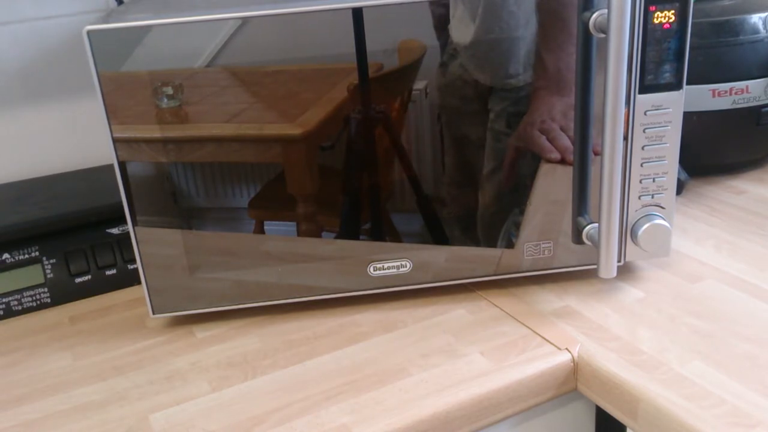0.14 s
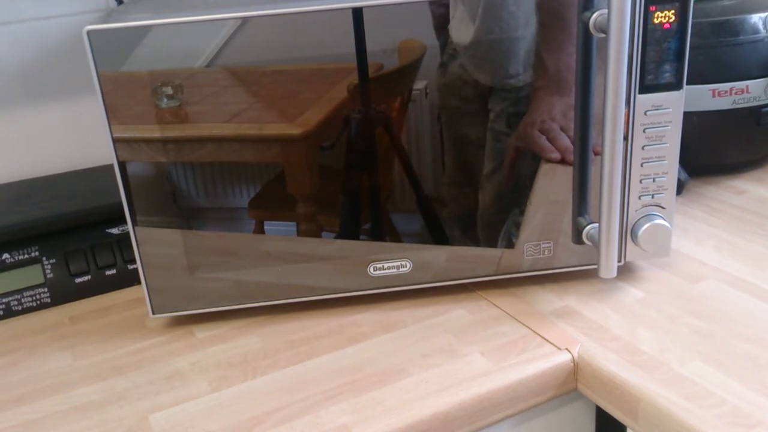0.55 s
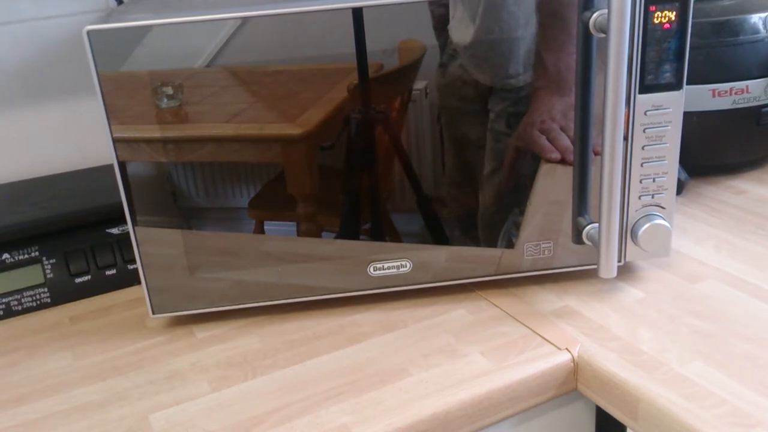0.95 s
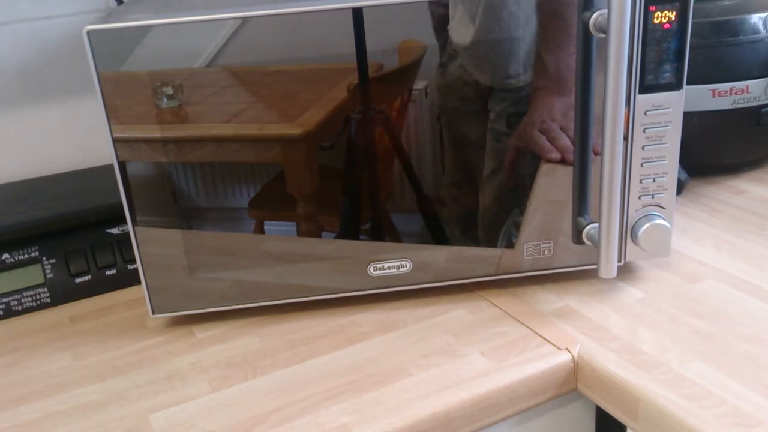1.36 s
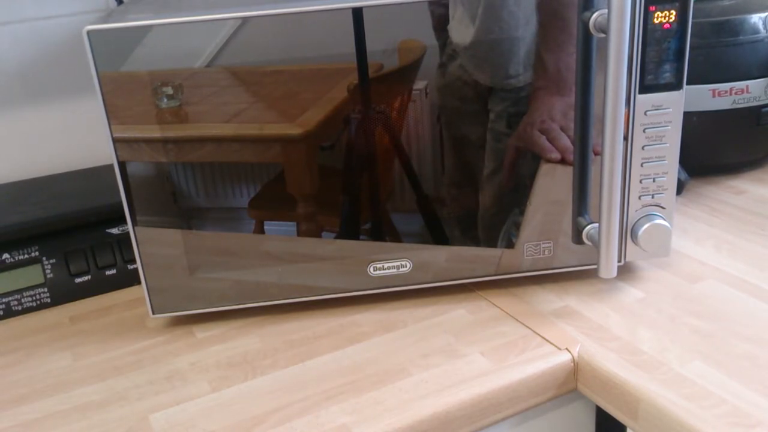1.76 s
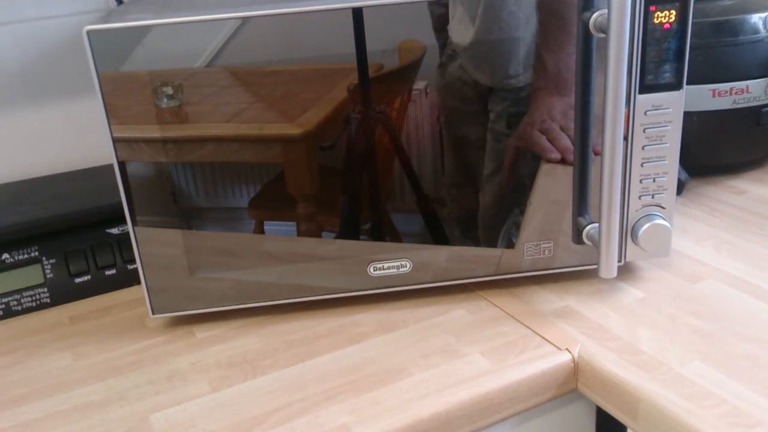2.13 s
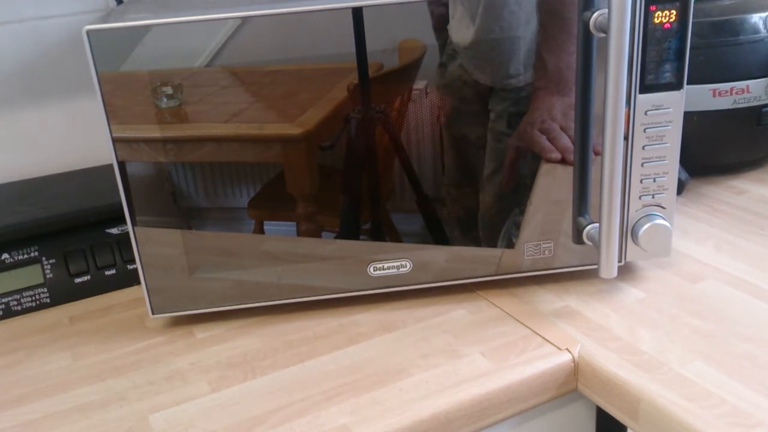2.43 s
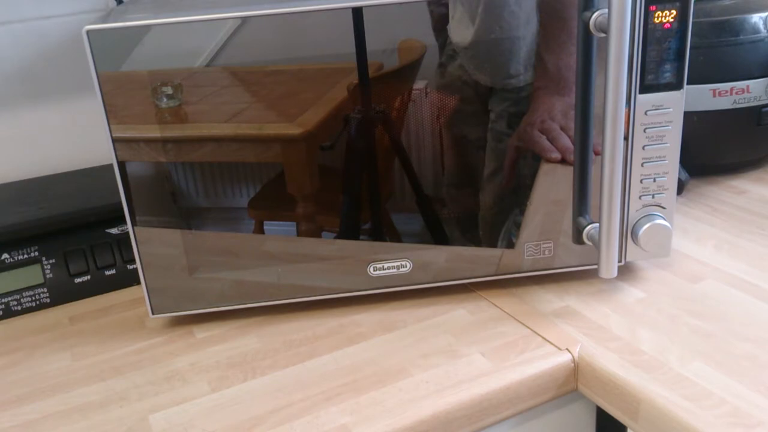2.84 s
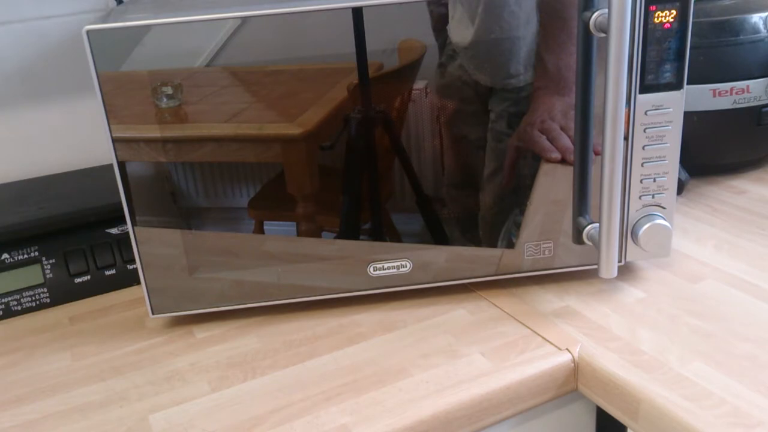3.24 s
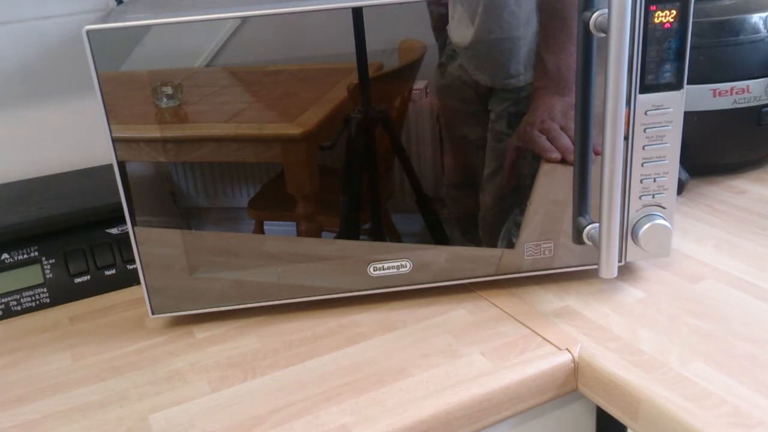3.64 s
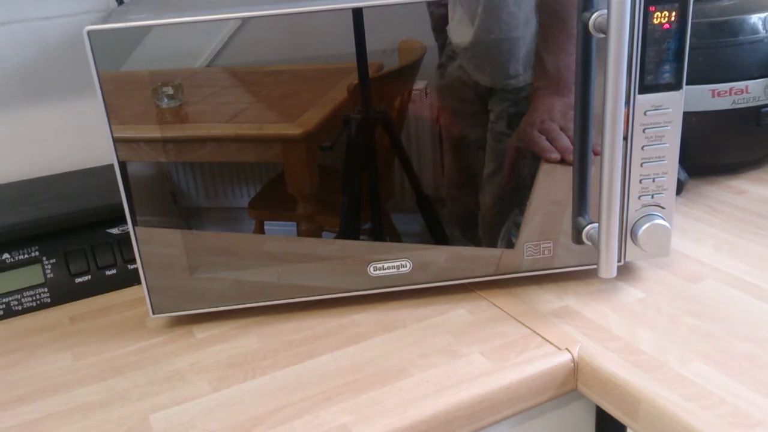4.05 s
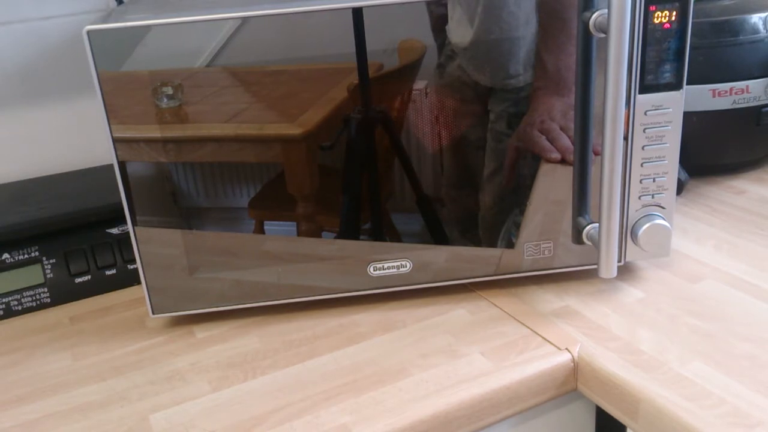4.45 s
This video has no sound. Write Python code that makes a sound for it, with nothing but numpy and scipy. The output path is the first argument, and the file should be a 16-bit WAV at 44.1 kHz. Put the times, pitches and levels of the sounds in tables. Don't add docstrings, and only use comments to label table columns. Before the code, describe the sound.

Continuous microwave drone in a small kitchen, recorded close in stereo. Mains hum dominates, joined by thin electrical buzz, broad airy rush from the vents and a hollow rumble of vibrating panels. Small gusts make a low blade tone rise and drop quickly several times, mostly after one and a half seconds. No beep, door or dish sounds; it neither starts nor stops.

```python
import sys
import numpy as np
from scipy import signal
from scipy.fft import rfft, irfft, next_fast_len
from scipy.io import wavfile
from scipy.ndimage import uniform_filter1d, map_coordinates

SR = 44100
rng = np.random.default_rng(int(sys.argv[2]) if len(sys.argv) > 2 else 0)


def to_wav(sig):
    pcm = np.clip(np.atleast_2d(sig), -1, 1) * 32767
    pcm = np.round(pcm).astype(np.int16)
    wavfile.write(sys.argv[1], SR, pcm.T)


def makeup_ratio(level_db):
    decades = np.asarray(level_db, float) / 20
    return 10 ** decades


N = 202330
SECONDS = np.arange(N) / SR
MAINS_HZ = 50.030


def unit(x):
    return x / np.sqrt(np.mean(x ** 2) + 1e-20)


def along(points, hz):
    point_hz, value = np.transpose(points)
    return np.interp(np.log(hz + 1), np.log(point_hz + 1), value)


def wobble(rate_hz):
    knots = rng.standard_normal(int(N * rate_hz / SR) + 4)
    return map_coordinates(knots, [np.arange(N) * rate_hz / SR])


def filtered(x, response):
    size = next_fast_len(N + SR // 2)
    spectrum = rfft(x, size) * response(np.fft.rfftfreq(size, 1 / SR))
    return irfft(spectrum, size)[..., :N]


def patchy(channels, depth_db):
    noise = signal.stft(rng.standard_normal((channels, N + 512)), nperseg=512)[2]
    patches = rng.standard_normal(noise.shape[1:])
    patches = uniform_filter1d(patches, size=5, axis=0)
    patches = uniform_filter1d(patches, size=12, axis=1)
    return signal.istft(noise * makeup_ratio(depth_db * unit(patches)), nperseg=512)[1][:, :N]


def tone(hz, left_db, right_db, lead, wander=0):
    phase = 2 * np.pi * (hz * SECONDS + rng.random()) + wander
    left = makeup_ratio(left_db) * np.sin(phase + lead / 2)
    right = makeup_ratio(right_db) * np.sin(phase - lead / 2)
    return np.sqrt(2) * np.array([left, right])


# (frequency [Hz], density [dB per Hz])
AIR_SPECTRUM = [(22, -4.5), (70, -7), (250, -1), (580, -2), (1250, -6), (2200, -5.5), (2750, -8),
                (3100, -11.5), (4500, -13.5), (5200, -20.5), (6500, -21.5), (7600, -17.5), (10600, -29.5),
                (13000, -31), (14200, -35)]
# (frequency [Hz], left-right likeness [-1 to 1])
AIR_LIKENESS = [(60, 0.29), (300, 0.69), (900, .4), (1200, 0.012), (2400, .15), (4000, 0.0059),
                (13000, 0.065)]
# (frequency [Hz], left minus right [dB])
AIR_BALANCE = [(60, -8.5), (800, -0.5), (1300, -3), (3000, -1), (5500, -2.5), (7400, -8), (8800, 8),
               (10500, 1)]
AIR_DB = -59


def air():
    def mid_side(hz):
        angle = np.arccos(np.clip(along(AIR_LIKENESS, hz), -1, 1)) / 2
        return makeup_ratio(along(AIR_SPECTRUM, hz)) * [np.cos(angle), np.sin(angle)]

    ripple_knots = rng.standard_normal((2, 800))

    def room_and_balance(hz):
        ripple = np.array([map_coordinates(knots, [hz / 35]) for knots in ripple_knots])
        ripple_db = along([(2000, 2.2), (6000, 1.1)], hz) * ripple
        return makeup_ratio(along(AIR_BALANCE, hz) * [[0.5], [-0.5]] + ripple_db)

    mid, side = filtered(patchy(channels=2, depth_db=0.88), mid_side)
    pair = filtered(np.array([mid + side, mid - side]), room_and_balance)
    return makeup_ratio(AIR_DB + 0.3 * wobble(3)) * unit(pair)


# (frequency [Hz], width [Hz], left level [dB], right level [dB])
PANEL_MODES = [(11.2, 8.8, -3.5, -2.5), (108.8, 14, -11.5, -8.5), (141.8, 16, -9, -3),
               (183, 24.5, -3.5, 0.5), (246.3, 16, -10, -6.5), (281.2, 26, -4.5, 0),
               (310, 9.5, -16.5, -14.5), (368.6, 24, -3.5, 0.5), (411, 10, -24, -3), (437, 14, -10.5, -10),
               (510, 32, -17.5, -12.5), (631, 54, -11, -8), (709, 40, -10, -11), (851, 46, -13.5, -15.5),
               (958, 48, -15, -10), (1688, 53, -18, -12.5)]
CABINET_DB = -57.5


def cabinet():
    def modes(hz):
        pair = 0
        for centre, width, left_db, right_db in PANEL_MODES:
            resonance = 1j * hz * width / (centre * centre - hz * hz + 1j * hz * width)
            pair = pair + makeup_ratio([[left_db], [right_db]]) * resonance
        steeper = np.abs(pair) ** 0.58
        return pair * steeper * np.exp([[0.2j], [-0.2j]])
    return makeup_ratio(CABINET_DB) * unit(filtered(patchy(channels=1, depth_db=2.0), modes))


# (frequency [Hz], left level [dB], right level [dB], left lead [rad], unsteadiness [dB])
MOTOR_TONES = [(34.55, -71, -62.5, .9, 1), (49.4, -73, -68, .3, 1.5), (138.1, -73, -69, .5, 2),
               (1384.5, -86, -81, .5, 4)]
# (time [s], peak level [dB])
BLADE_GUSTS = [(0.22, -67), (1.22, -62), (1.63, -56), (2.05, -56.5), (2.26, -62), (2.6, -64), (3.0, -55),
               (3.57, -62), (4.03, -59), (4.22, -53), (4.42, -62)]
GUST_RISE_DB_PER_S, GUST_FALL_DB_PER_S, BLADE_REST_DB = 68.5, 150, -70.5


def motors():
    out = np.zeros((2, N))
    for hz, left_db, right_db, lead, shake_db in MOTOR_TONES:
        level = makeup_ratio(shake_db * wobble(2.5))
        out += level * tone(hz, left_db, right_db, lead, wander=0.19 * shake_db * wobble(1.2))

    peak_s, peak_db = np.transpose(BLADE_GUSTS)[:, :, None]
    after = SECONDS - peak_s
    swell_db = peak_db + np.minimum(GUST_RISE_DB_PER_S * after, -GUST_FALL_DB_PER_S * after)
    blade_level = makeup_ratio(np.maximum(swell_db.max(axis=0), BLADE_REST_DB))
    return out + blade_level * tone(276.4, -4, 1, lead=0.2, wander=0.8 * wobble(4))


# (multiple of mains, left level [dB], right level [dB], left lead [rad])
LOAD_WHINE = [(13, -80.0, -74.0, 0.8), (14, -74.0, -84.0, 0.2), (21, -80.0, -79.0, 2.5),
              (25, -90.0, -78.0, 2.7), (28, -96.0, -76.0, -1.0), (39, -82.0, -80.0, 2.7),
              (40, -81.0, -82.0, -0.1), (45, -78.0, -87.0, -0.1), (48, -87.0, -79.0, 2.3),
              (52, -84.0, -81.0, 0.5), (57, -89.0, -84.0, 1.4), (60, -92.0, -81.0, -3.1),
              (67, -92.0, -84.0, -0.1), (87, -99.0, -87.0, 0.2)]
# (frequency [Hz], level [dB rms])
BUZZ_SPECTRUM = [(400, -83.5), (1000, -83.5), (1600, -83.5), (3000, -94), (5000, -98), (7500, -97),
                 (9500, -100), (12000, -111)]
ODD_FROM_HZ, ODD_DB = 3200, 4


def buzz():
    multiples = np.setdiff1d(np.arange(9, 240), np.transpose(TRANSFORMER_HUM)[0]).astype(int)
    hz = multiples * MAINS_HZ
    shape = (2, len(multiples))
    scatter = (rng.standard_normal(shape) + 1j * rng.standard_normal(shape)) / np.sqrt(2)
    odd_db = ODD_DB * (multiples % 2 - 0.5) * (hz > ODD_FROM_HZ)
    spectrum = np.zeros((2, 2049), complex)
    spectrum[:, multiples] = scatter * makeup_ratio(along(BUZZ_SPECTRUM, hz) + odd_db)
    for multiple, left_db, right_db, lead in LOAD_WHINE:
        phase = 2 * np.pi * rng.random() + 0.5 * lead * np.array([1, -1])
        spectrum[:, int(multiple)] = makeup_ratio([left_db, right_db]) * np.exp(1j * phase)

    cycles = irfft(spectrum) * 2048 * np.sqrt(2)
    size = cycles.shape[1]
    place = SECONDS * MAINS_HZ % 1 * size
    pair = np.array([np.interp(place, np.arange(size), cycle, period=size) for cycle in cycles])
    return pair * makeup_ratio(0.7 * wobble(2))


# (multiple of mains, left level [dB], right level [dB], left lead [rad])
TRANSFORMER_HUM = [(2, -63.3, -62.0, 0.5), (3, -71.7, -66.3, 0.3), (4, -55.4, -50.1, 0.4),
                   (5, -66.6, -65.3, 0.4), (6, -63.9, -57.8, 0.1), (7, -66.5, -64.7, -0.0),
                   (8, -64.5, -59.7, 0.1), (10, -45.6, -42.0, -0.3), (11, -73.6, -73.1, 0.5),
                   (12, -70.3, -73.9, 0.2), (16, -70.5, -74.0, -2.7), (17, -72.5, -85.6, -1.4),
                   (18, -72.3, -66.6, -1.4), (20, -70.9, -72.6, -0.7), (22, -85.2, -74.8, 1.5),
                   (23, -73.1, -69.3, 2.2), (24, -76.9, -82.7, -2.6), (26, -75.4, -79.3, -0.6),
                   (29, -78.0, -80.5, 2.1), (32, -80.1, -78.6, 1.9), (38, -84.6, -72.1, -0.3),
                   (42, -74.9, -93.0, 0.4), (44, -71.7, -82.0, 1.3), (54, -78.8, -81.7, -1.0),
                   (55, -105.5, -81.1, 0.6), (89, -82.5, -88.3, -0.2), (145, -88.9, -79.9, 1.9),
                   (177, -90.6, -95.0, 2.2), (179, -89.5, -102.8, 0.6), (197, -93.1, -101.1, 0.3)]
SWUNG_OVERTONES = (2, 6, 7, 8, 10)
# (depth [0-1], loudest near [s])
PLATE_SWINGS = [(.15, 3.0), (0.51, 2.5), (.5, .5), (.06, 2), (0.02, 4.1)]
PLATE_TURN_S = 9.1
SWING_SKEW = 0.35
WARM_SAG_DB_PER_S, SAG_BELOW_HZ = 0.31, 520


def transformer():
    swings = dict(zip(SWUNG_OVERTONES, PLATE_SWINGS))
    out = np.zeros((2, N))
    for multiple, left_db, right_db, lead in TRANSFORMER_HUM:
        hz = multiple * MAINS_HZ
        if multiple in swings:
            depth, loudest_s = swings[multiple]
            angle = 4 * np.pi * (SECONDS - loudest_s) / PLATE_TURN_S
            gain = unit(1 + depth * (np.cos(angle) + SWING_SKEW * np.sin(2 * angle)))
        else:
            gain = makeup_ratio(min(0.05 * multiple, 0.9) * wobble(2))
        if hz < SAG_BELOW_HZ:
            gain = gain * makeup_ratio(WARM_SAG_DB_PER_S * (N / 2 / SR - SECONDS))
        out += gain * tone(hz, left_db, right_db, lead)
    return out


def scene():
    return air() + cabinet() + motors() + buzz() + transformer()


def top_cut(x):
    return signal.sosfilt(signal.butter(12, 14240, fs=SR, output="sos"), x)


def record(dry):
    return top_cut(dry)


dry = scene()
out = record(dry)
to_wav(out)
```